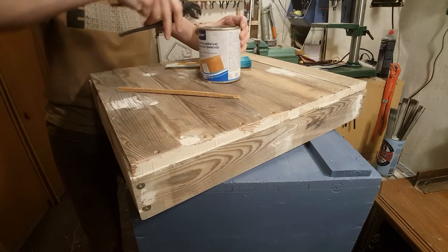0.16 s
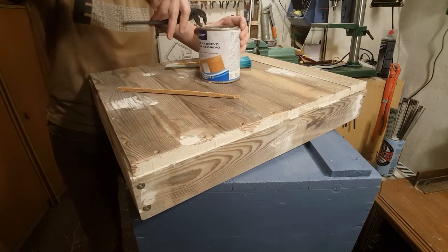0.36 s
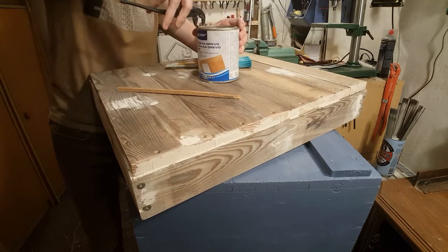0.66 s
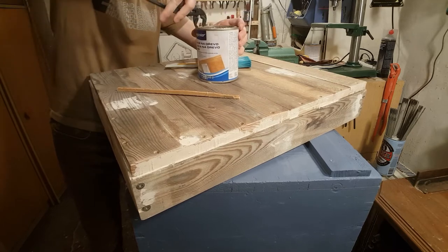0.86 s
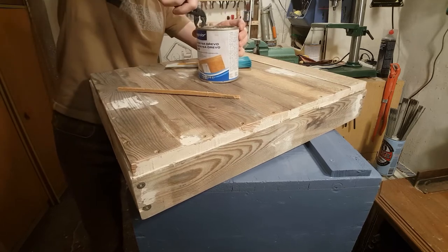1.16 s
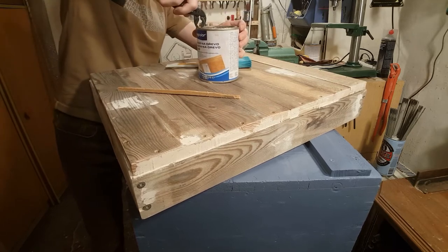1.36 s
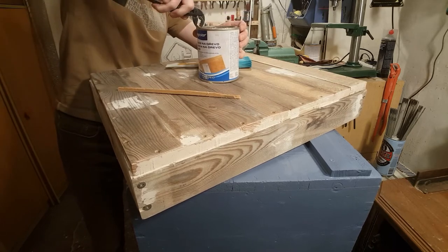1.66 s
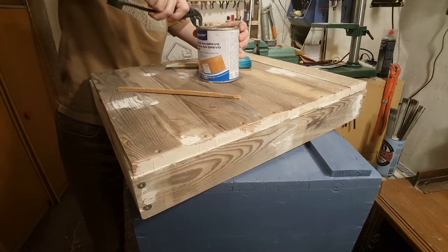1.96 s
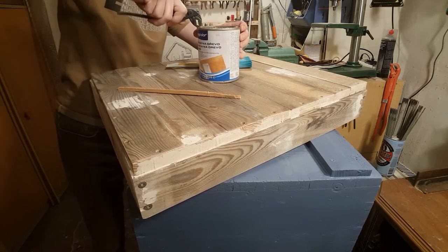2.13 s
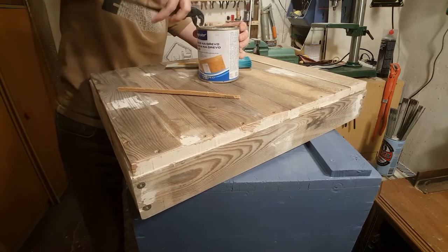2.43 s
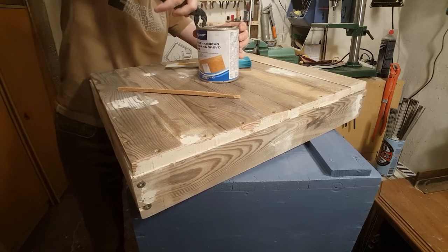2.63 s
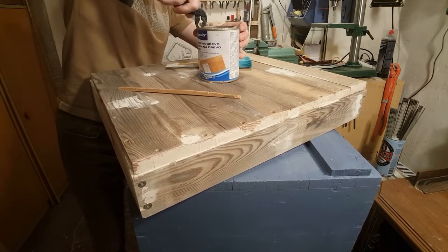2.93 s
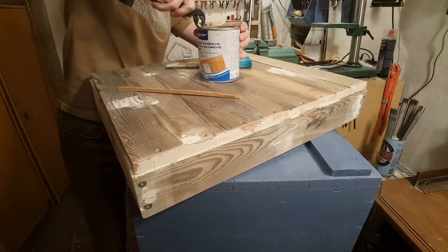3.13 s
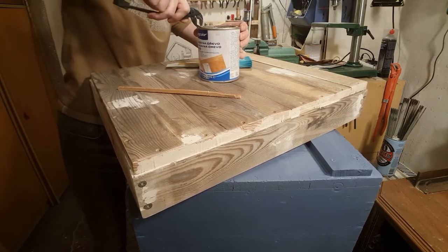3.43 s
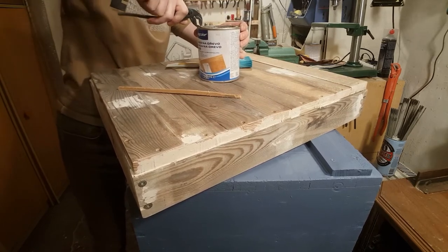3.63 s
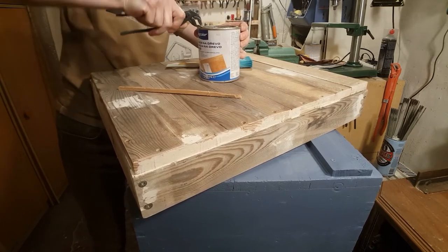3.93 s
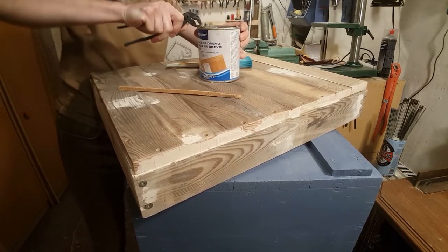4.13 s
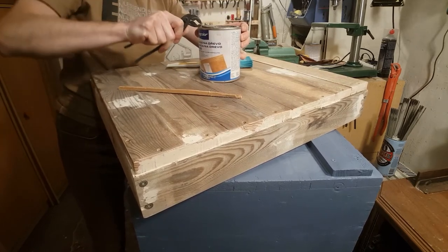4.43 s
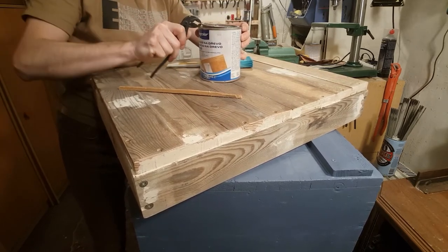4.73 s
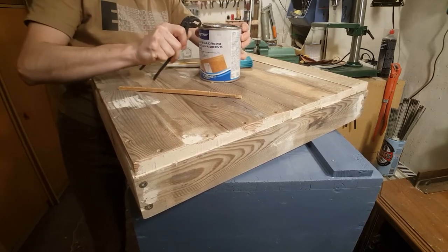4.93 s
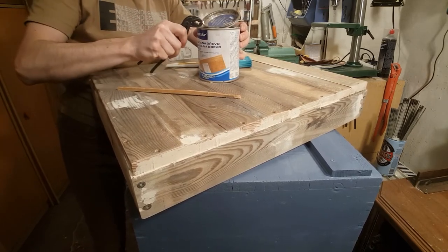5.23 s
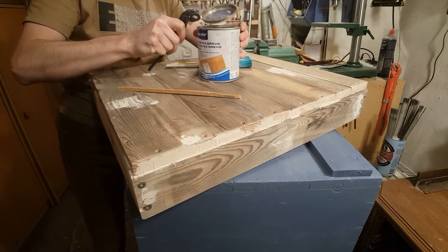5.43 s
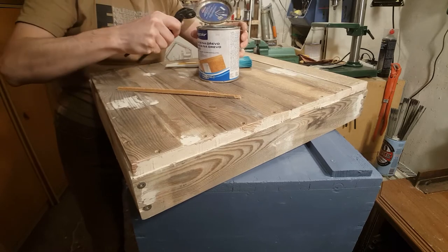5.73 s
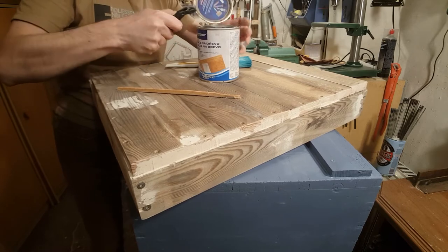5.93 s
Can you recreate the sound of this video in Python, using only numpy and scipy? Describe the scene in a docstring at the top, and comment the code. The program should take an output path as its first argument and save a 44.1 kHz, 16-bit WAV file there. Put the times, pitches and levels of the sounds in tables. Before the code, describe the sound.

In a small dry workshop, irregular metallic clacks and hollow wooden knocks as a can lid is levered, loudest at two seconds.

```python
"""Steel pliers pry the lid off a paint can that stands on a hollow wooden box in a small workshop.
Each slip or knock rings the tin, the box under it and the steel jaws, each as a set of fading tones.
Between tries the can bumps and shuffles on the wood (dense random grains), and the jaws tick on the rim.
A short dry room (fading noise) answers every sound, over a faint hush of filtered noise."""
import sys
import numpy as np
from scipy import signal
from scipy.fft import rfft, irfft
from scipy.io import wavfile
from scipy.ndimage import uniform_filter1d

SR = 44100
rng = np.random.default_rng(int(sys.argv[2]) if len(sys.argv) > 2 else 0)


def pcm_store(signal):
    """Save signal as 16-bit PCM."""
    levels = np.round(np.clip(np.atleast_2d(signal), -1, 1) * 32767)
    wavfile.write(sys.argv[1], SR, levels.astype(np.int16).T)


N = 268216  # length in samples


def undb(db):
    """Turn decibels into a gain."""
    return 10 ** (np.asarray(db) / 20)


def pan(left_minus_right_db):
    """Gains for left and right that differ by this many dB."""
    return undb(np.array([[left_minus_right_db], [-left_minus_right_db]]) / 2)


def unit(x):
    """Scale to an rms of 1."""
    return x / np.sqrt(np.mean(x ** 2))


def by_hz(table, hz, axis=1):
    """Read a table column at any frequency, in straight lines over log frequency."""
    table = np.array(table, float)
    return np.interp(np.log(np.maximum(hz, 1)), np.log(table[:, 0]), table[:, axis])


def stereo_noise(mid, side, likeness):
    """Mix two independent noises into left and right that are alike by the given correlation."""
    shared = np.sqrt(1 + likeness) * mid
    opposed = np.sqrt(1 - likeness) * side
    return np.array([shared + opposed, shared - opposed])


def favour(modes, loud_hz, tilt_db, peak_db, octaves):
    """Shade the modes in dB: a slope per octave, plus a lift (or dip) for those near loud_hz."""
    away = np.log2(np.array(modes)[:, :1] / loud_hz)
    return tilt_db * away + peak_db * np.exp(-(away / octaves) ** 2)


def ring(modes, shade_db=0, detune=0, turn=0, rise_s=.0001):
    """A struck body sounds as many fading tones, its modes; scaled to unit energy."""
    hz, db, t60 = np.array(modes, float).T[:, :, None]
    t = np.arange(SR // 5) / SR
    turn = turn + np.arange(len(hz))[:, None] / 2  # neighbouring modes start in opposite directions
    tones = np.sin(2 * np.pi * (hz * (1 + detune) * t + turn))
    fade = 1000 ** (-t / t60)
    y = np.sum(undb(db + shade_db) * tones * fade, axis=0)
    y = y * (1 - np.exp(-t / rise_s))
    return y / np.linalg.norm(y)


# The ringing tones of the wooden box, the tin can and the steel jaws, before each blow shades them.
# Each row: pitch in Hz, level in dB against the body's other tones, time to fade by 60 dB in seconds.
BOX_MODES = [(107.4, -20.5, 0.072), (172.8, -13, 0.09), (226, -4, 0.14), (296, 3.5, 0.071),
             (340.3, 1, 0.055), (435, -1, 0.07), (486, 5, 0.032), (604, -2, 0.04)]
TIN_MODES = [(679.2, -6.5, 0.033), (717, -5.5, 0.014), (772, 0, 0.023), (888, 0.5, 0.026),
             (1034.8, -0.5, 0.023), (1261, -6, 0.042), (1416, -9.5, 0.089), (1557, -1, 0.026),
             (1696.5, -3, 0.026), (1900, -1.5, 0.016), (2056, -7, .04), (2280, -5, 0.027),
             (2540, -7.5, 0.025), (2767, -6, 0.016), (3006, -5.5, 0.014)]
STEEL_MODES = [(3350, 0, 0.0038), (3750, -1.7, 0.0034), (4117, -12.5, 0.013), (4500, -8.5, 0.0069),
               (4750, -2, 0.003), (5186, 2.5, .004), (5870, -6, 0.0042), (5905, -7, 0.0071),
               (6600, -3.5, 0.004), (7660, -3.5, 0.0048), (8620, -5.5, 0.0066), (9600, -3.5, 0.0045),
               (10700, -2, 0.002), (12100, 1, 0.0025), (13700, 3.5, 0.002), (15200, 0, 0.0025)]


def knocks(blows, pan_db, steel_peak_db, steel_grip, scatter_db=2.0, box_rise_s=0.002):
    """Every blow lands on another spot, so it weighs the modes anew; the planks take a moment to answer."""
    out = np.zeros((2, N + SR))
    steel_modes = np.array(STEEL_MODES) * [1, 1, steel_grip]  # a firm grip shortens the rings
    chance = rng.standard_normal((len(blows), 3, 3, 16, 1))

    def struck(modes, draws, lean_db, rise_s, spread, loose):
        """Ring one body with random shading, detuning and starting phase."""
        shade, detune, turn = draws[:, :len(modes)]
        return ring(modes, scatter_db * shade + lean_db, spread * detune, loose * turn, rise_s)

    for row, draws in zip(blows, chance):
        (start_s, tin_db, tin_hz, tin_tilt_db, steel_db, steel_hz, steel_tilt_db,
         box_db, box_tilt_db, contact_ms) = row
        contact_s = contact_ms / 1000  # a longer contact makes a softer start
        tin_lean = favour(TIN_MODES, tin_hz, tin_tilt_db, 7.7, 0.28)
        steel_lean = favour(STEEL_MODES, steel_hz, steel_tilt_db, steel_peak_db, 0.4)
        box_lean = favour(BOX_MODES, 300, box_tilt_db, 3.2, 0.37)
        tin = struck(TIN_MODES, draws[0], tin_lean, contact_s, 0.013, 0.46)
        steel = struck(steel_modes, draws[1], steel_lean, contact_s, 0.015, 0.067)
        box = struck(BOX_MODES, draws[2], box_lean, box_rise_s + contact_s, .015, .3)
        blow = undb(tin_db) * tin + undb(steel_db) * steel + undb(box_db) * box
        i = int(start_s * SR)
        out[:, i:i + len(blow)] += blow * pan(pan_db)
    return out[:, :N]


JAW_HZ = 4700  # centre of the steel shading in slips and bumps

# The jaws slip off the lid or the lid jumps.
# Each row: start in seconds, tin level in dB, box level in dB, steel level in dB, favoured tin pitch in Hz,
# slopes of tin, steel and box in dB per octave, contact time in ms.
SLIP_TABLE = [(0.395, -23.5, -12.5, -37.5, 700, -7, -5, 7, .5),
              (0.483, -36, -23.5, -53, 800, -24, -4.5, 7, .8),
              (0.587, -8, -5.5, -24, 1420, -6.5, -9.5, -4, .6),
              (0.615, -8.5, -7.5, -38, 800, -6.5, -1, -3, .8),
              (1.078, -6, -6.5, -33, 887, -6, -0.5, 0.5, 1.8), (1.837, 1, 1, -10.5, 700, -1, 4.5, 0, 1.8),
              (1.866, -32, -2, -35, 1995, 1, 1.5, -7, 1), (2.012, 15.5, 11.5, 3, 2100, -2.5, -3.5, 3, 1.2),
              (2.043, 5.5, 10, -9, 767, 2.5, -6.5, 6, 1.45),
              (2.767, -13, -10.5, -40, 890, -6, 1, -10.5, 1.6), (4.613, -12, -20, -8, 2400, 1.5, -2, 2, .6),
              (4.994, -10, 3.5, -16, 1480, 3.5, -2.3, -2.5, 1.7), (5.022, 3, 4.8, -22, 853, -4, 0, 4, 1.5),
              (5.05, -14, -20, -34, 1600, -4.5, 3, 29, 0.78)]


def slips():
    """Hard snaps that ring tin, steel and box together."""
    blows = [(s, tin, hz, tilt, steel, JAW_HZ, steel_tilt, box, box_tilt, ms)
             for s, tin, box, steel, hz, tilt, steel_tilt, box_tilt, ms in SLIP_TABLE]
    return knocks(blows, pan_db=4.0, steel_peak_db=6.0, steel_grip=0.71)


# The can bumps on the planks.
# Each row: start in seconds, tin level in dB, box level in dB, favoured tin pitch in Hz,
# box slope in dB per octave.
BUMP_TABLE = [(0.001, -30.5, -8, 720, -11), (0.076, -37, -22, 1740, -2), (0.218, -42, -24.5, 710, -3),
              (0.304, -37, -32, 840, -1.5), (0.517, -35, -15, 900, 11.5), (0.628, -41, -17, 800, 9),
              (0.651, -45, -17.5, 790, -8), (0.767, -58, -63, 790, -12), (0.944, -51.5, -27.5, 700, -7),
              (1.31, -31.5, -34, 774, 2), (1.333, -36.5, -41, 750, -10), (1.345, -28, -21, 724, -10),
              (1.604, -38.5, -37.5, 900, 0), (1.661, -42.5, -37.5, 1000, -4),
              (1.722, -26, -18.5, 1040, -12.5), (2.263, -27.5, -22, 701, -4), (2.317, -19, -18.5, 760, 1),
              (2.467, -38, -35, 708, 2), (2.492, -36, -26.5, 2030, 3), (2.572, -36, -47.5, 2020, 0.5),
              (2.633, -41, -31, 788, -3.5), (2.75, -31, -22, 909, -11), (2.861, -43.5, -21.5, 777, -11.5),
              (2.893, -31.5, -25.5, 815, -2), (2.927, -33.5, -29, 797, 13.5), (3.083, -37.5, -31, 1240, 4),
              (3.166, -33, -35, 999, -1.5), (3.203, -32.5, -36, 1250, -14), (3.58, -39, -46.5, 781, -1.5),
              (3.752, -43, -43, 915, -1.5), (4.652, -19.5, -12, 697, 0), (4.679, -38, -10.5, 754, -1),
              (4.894, -43.5, -35, 700, 1.5), (5.49, -48, -46, 1014, -1), (5.505, -39.5, -41, 930, -1),
              (5.539, -36, -39, 860, -8), (5.566, -46.5, -43, 861, 1), (5.624, -41, -40.5, 920, -1.5),
              (5.697, -40.5, -41.5, 1400, -3.5)]


def bumps():
    """Dull blows: tin leaning to its low modes and the box, hardly any steel."""
    contact_ms, tin_tilt_db = .8, -7  # slope per octave
    steel_below_tin_db = -28
    blows = [(s, tin, hz, tin_tilt_db, tin + steel_below_tin_db, JAW_HZ, 0, box, tilt, contact_ms)
             for s, tin, box, hz, tilt in BUMP_TABLE]
    return knocks(blows, pan_db=3.5, steel_peak_db=-7, steel_grip=0.24)


# The jaws tick against the rim.
# Each row: start in seconds, steel level in dB, favoured steel pitch in Hz, steel slope in dB per octave,
# tin level in dB, favoured tin pitch in Hz.
TICK_TABLE = [(1.699, -29.5, 6900, 2, -36, 1140), (4.103, -32, 6330, -0.5, -37.5, 1580),
              (4.12, -39.5, 6300, 4, -57, 1500), (4.263, -20, 5160, 0.5, -35, 2400),
              (4.327, -43, 8450, -2.5, -47, 1500), (4.415, -25, 4500, -3, -31.5, 2060),
              (4.483, -45, 5140, 9, -58, 2120), (4.544, -35.5, 4400, -2.5, -36.5, 700),
              (4.579, -34.5, 4400, -4, -53, 1500), (4.598, -40.5, 4370, 7.5, -37.5, 1466),
              (5.223, -45.5, 4170, -6.5, -46, 2776)]


def ticks():
    """Light, bright touches of steel on the rim."""
    contact_ms, tin_tilt_db = 0.7, 1  # slope per octave
    box_below_tin_db = -12
    blows = [(s, tin, tin_hz, tin_tilt_db, steel, hz, tilt, tin + box_below_tin_db, 0, contact_ms)
             for s, steel, hz, tilt, tin, tin_hz in TICK_TABLE]
    return knocks(blows, pan_db=3.5, steel_peak_db=13.5, steel_grip=0.71)


# The can is shuffled over the planks.
# Each row: loudest moment in seconds, swell in seconds, fade in seconds, then the peak levels in dB
# of the box rumble, the tin rasp and the gritty hiss.
SHUFFLE_TABLE = [(0.21, 0.18, 0.41, -78, -73, -84), (0.564, 0.13, 0.027, -42.5, -50, -58.5),
                 (0.78, 0.18, 0.51, -69, -72.5, -80), (1.28, 0.031, 0.28, -67, -85, -83),
                 (1.691, 0.068, 0.2, -64.5, -62.5, -81.5), (2.275, 0.014, 0.17, -51, -71.5, -92),
                 (2.56, 0.11, 0.12, -67, -71, -95), (2.9, 0.19, 0.37, -56.5, -69.5, -79),
                 (3.18, 0.2, 0.18, -72.5, -70, -88), (4.591, 0.079, 0.036, -79, -62.5, -62),
                 (5.141, .02, 0.22, -62.5, -70, -79), (5.23, 0.051, 0.033, -79.5, -75.5, -77),
                 (5.71, .5, 0.84, -83, -98.5, -97.5)]


def shuffle(pan_db=2.0):
    """Dense uneven stick-slip grains shake box, tin and the grit under the rim."""
    t = np.arange(N) / SR
    rows = np.array(SHUFFLE_TABLE)
    peak_s, swell_s, fade_s = rows[:, :3].T[:, :, None]
    # 20 dB down one swell before the peak and one fade after it
    push = undb(-20 * np.maximum((peak_s - t) / swell_s, (t - peak_s) / fade_s))
    out = 0
    # each layer: body, slips a second, spread of sizes in dB, slope in dB per octave
    layers = [(BOX_MODES, 300., 2.5, -.1), (TIN_MODES, 400., 3.5, -4.5), (STEEL_MODES, 2500., 2.5, -1.5)]
    for (modes, slips_per_s, spread_db, tilt_db), peak_db in zip(layers, rows[:, 3:].T):
        happens = rng.random(N) < slips_per_s / SR
        size = undb(spread_db * np.minimum(rng.exponential(size=N), np.e))
        grains = happens * size * rng.choice([-1, 1], N)
        level = undb(peak_db) @ push  # all shuffles added up
        modes = np.array(modes) * [1, 1, .45]  # pressed contact damps the rings
        body = ring(modes, favour(modes, modes[0][0], tilt_db, 0, 1), rise_s=0.00033)
        out = out + signal.fftconvolve(unit(grains) * level, body)[:N]
    return out * pan(pan_db)


# How the room answers at each pitch.
# Each row: pitch in Hz, time to fade by 60 dB in seconds, level in dB,
# likeness of left and right (correlation, 1 is identical).
ROOM_TABLE = [(90, 0.92, 1.5, 1), (190.6, 0.09, -4.5, 0.97), (344, 0.21, 1.5, 0.68), (695, .24, 3, 0.41),
              (2039, 0.21, 2, 0.34), (3500, .22, 4, 0.58), (5000, 0.15, -0.5, 0.82),
              (9000, .22, -0.5, -0.15), (15020, 0.19, -0.5, 0.035)]


def room(x, first_s=0.00083, build_s=0.0037, pan_db=1.0):
    """Dense reflections build up quickly and die away band by band, partly alike left and right."""
    t = np.arange(SR // 2) / SR
    noise = rng.standard_normal((2, len(t)))
    hz, frames, (mid, side) = signal.stft(noise, SR, nperseg=512, noverlap=448)
    bands = stereo_noise(mid, side, by_hz(ROOM_TABLE, hz, axis=3)[:, None])
    bands = bands * 1000 ** (-frames / by_hz(ROOM_TABLE, hz)[:, None])
    tail = signal.istft(bands, SR, nperseg=512, noverlap=448)[1][:, :len(t)]
    tail = rfft(tail * np.clip((t - first_s) / build_s, 0, 1))
    # reflections are so dense that every stretch of 40 Hz (20 bins) carries the table's level
    tail = tail / np.sqrt(uniform_filter1d(np.abs(tail) ** 2, size=20))
    tail_hz = np.fft.rfftfreq(len(t), 1 / SR)
    tail = irfft(tail * undb(by_hz(ROOM_TABLE, tail_hz, axis=2)), len(t))
    tail = tail * np.clip((.4 - t) / .05, 0, 1)  # silent from 0.4 s on
    mono = x.mean(axis=0, keepdims=True)
    return signal.fftconvolve(mono, tail, axes=1)[:, :N] * pan(pan_db)


# The colour of the hush. Each row: pitch in Hz, relative level in dB per Hz.
HUSH_COLOUR = [(13, -0.5), (21, -20.5), (36, -24.5), (60, -22), (182, -17.5), (238, -22.5), (1030, -27.5),
               (1640, -30), (7920, -39.5), (10100, -41), (15200, -38.5), (16500, -52.5)]
# How alike its two sides are. Each row: pitch in Hz, left-right correlation.
HUSH_ALIKE = [(30, 0.057), (200, 0.53), (700, 0.55), (2000, 0.0087)]


def hush():
    """Steady air and preamp noise, its likeness left and right changing with pitch."""
    hz = np.fft.rfftfreq(N, 1 / SR)
    mid, side = rfft(rng.standard_normal((2, N)))
    both = stereo_noise(mid, side, by_hz(HUSH_ALIKE, hz))
    noise = unit(irfft(both * undb(by_hz(HUSH_COLOUR, hz)), N))
    return noise * undb(-66.5 + np.array([[1.2], [-.8]]))  # rms dB, then left and right offsets


def scene():
    """The work on the can, its room and the hush; small things radiate little deep bass."""
    work = slips() + bumps() + ticks() + shuffle()
    low_cut = signal.butter(3, 110, "high", fs=SR, output="sos")  # Hz
    work = signal.sosfilt(low_cut, work)
    direct = np.array([np.roll(work[0], 1), work[1]])  # left arrives one sample later
    return direct + room(work) + hush()


def record(dry):
    """Round the loudest peaks softly, then cut the treble above 16300 Hz."""
    top_cut = signal.ellip(10, .2, 70, 16300, fs=SR, output="sos")
    return signal.sosfilt(top_cut, np.tanh(dry))


dry = scene()
out = record(dry)
pcm_store(out)
```